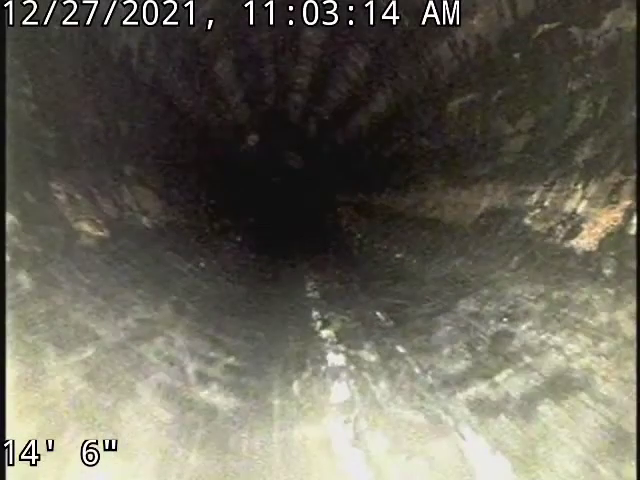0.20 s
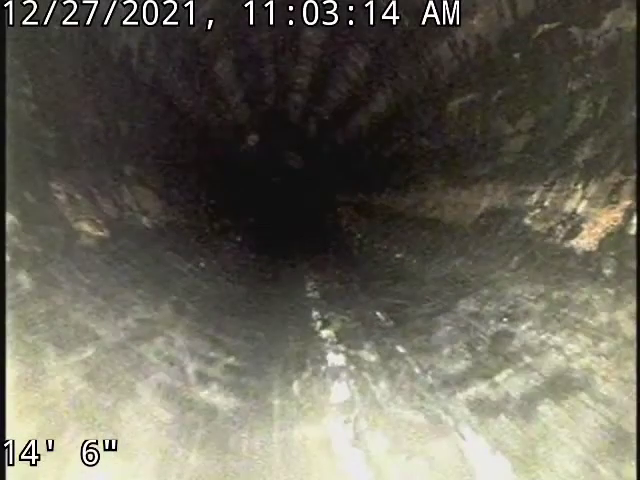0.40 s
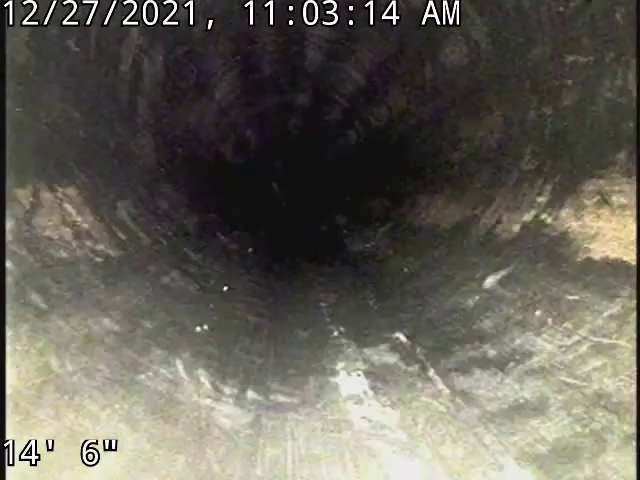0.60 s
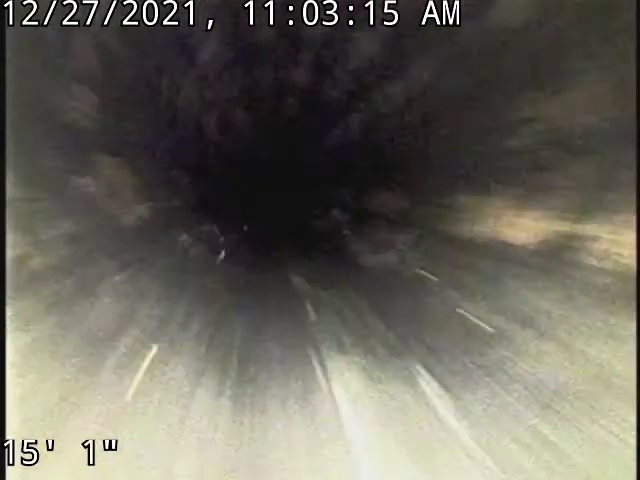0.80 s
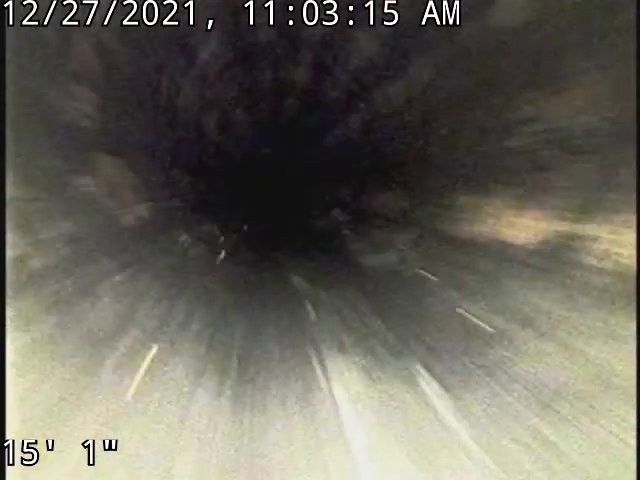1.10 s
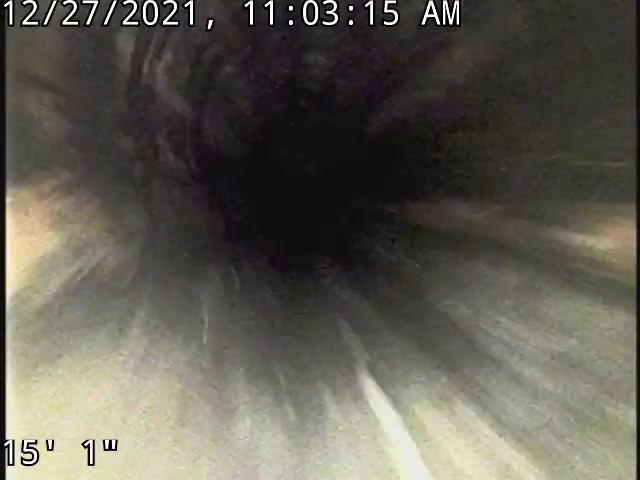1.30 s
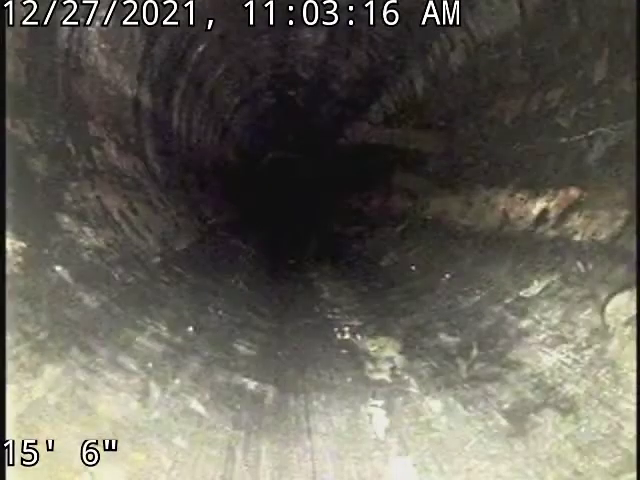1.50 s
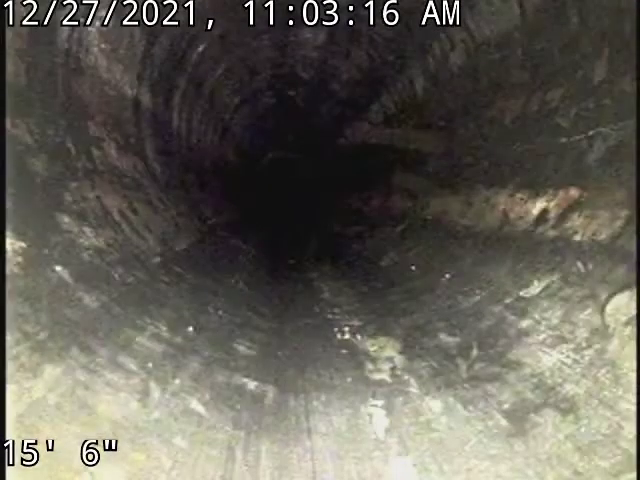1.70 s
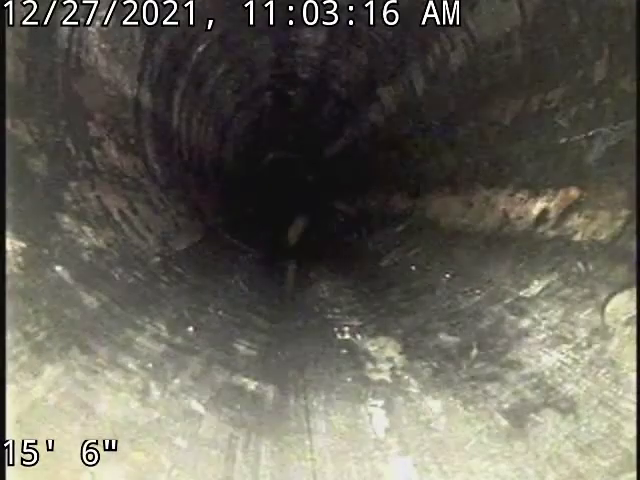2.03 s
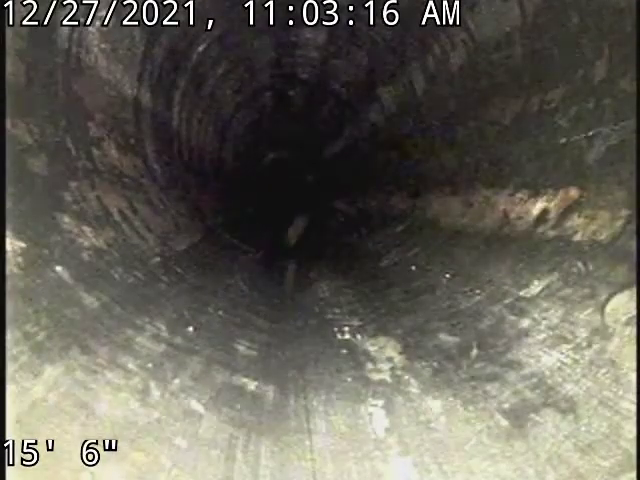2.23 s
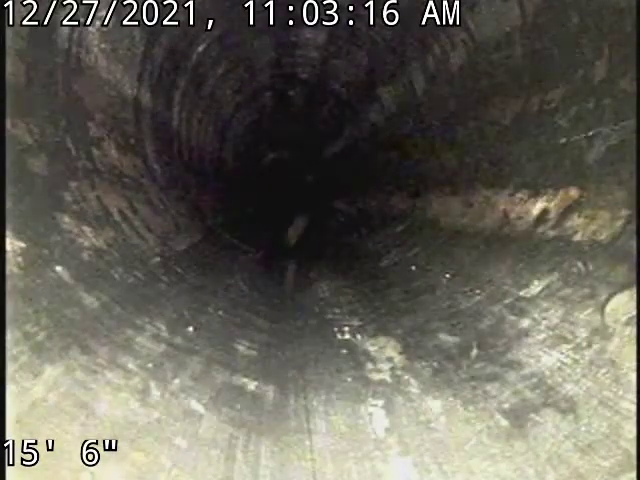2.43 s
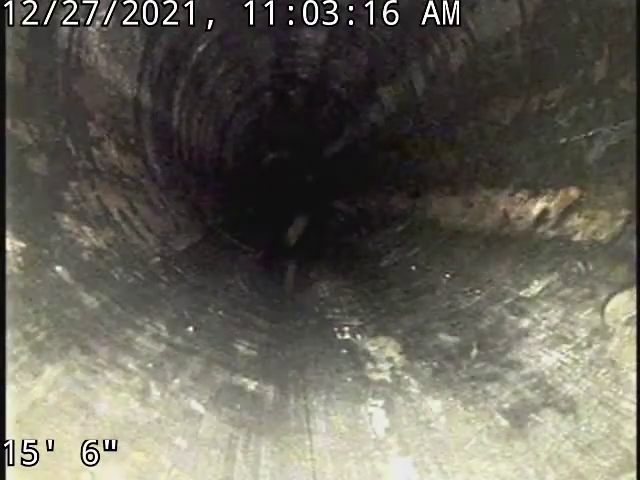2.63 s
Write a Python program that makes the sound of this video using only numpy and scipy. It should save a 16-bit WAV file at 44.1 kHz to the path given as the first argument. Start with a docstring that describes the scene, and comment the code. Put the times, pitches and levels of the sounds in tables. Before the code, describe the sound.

A stiff cable is pushed down a drain pipe, heard close in a slightly reverberant garage over faint low rumble. A light knock at the start, then gritty sliding and knocks from 0.2 s, peaking in a hard, tight clatter around 0.63 s. A stray knock at 0.9 s, then quiet with faint rustle and ticks. From 1.8 s scraping resumes, strongest near 2.2 s, with last small knocks at 2.5 s.

```python
"""A light knock on a pipe over a low rumble, then gritty sliding and a clatter of knocks: a stiff push cable
is fed by hand into a drain pipe in a garage, in two pushes with a pause between.
Friction grains (slide) and blows within short scuffs (knocks) ring the same bank of pipe modes.
Ticks and snaps are resonated noise bursts; treble hiss and rustle are shaped grains; rumble and air are
shaped noise, and a faint hum in the pause is noise through a narrow resonance."""
import sys
import numpy as np
from scipy import signal
from scipy.fft import rfft, irfft, next_fast_len
from scipy.io import wavfile

SR = 44100
rng = np.random.default_rng(int(sys.argv[2]) if len(sys.argv) > 2 else 0)


def log_audio(samples):
    """Write samples as a 16-bit WAV file to the path given in sys.argv[1]."""
    # one column per channel
    frames = np.atleast_2d(samples).T
    # limit to full scale, then quantise
    limited = np.clip(frames, -1, 1)
    pcm = np.round(limited * 32767).astype(np.int16)
    wavfile.write(sys.argv[1], SR, pcm)


N = 123480

# Spectrum of the still air: (frequency [Hz], relative density [dB])
AIR_COLOUR = [(88, -53), (150, -9.5), (320, -13.5), (394, -21), (765, -31.5), (1280, -25), (1600, -34),
              (2530, -30), (8820, -46), (13900, -21)]
# Swells of the garage's low rumble: (time [s], level [dB])
RUMBLE_LEVEL = [(0.0, -71), (0.06, -48.5), (0.12, -64), (0.2, -51), (0.55, -51), (0.6, -71), (0.65, -44),
                (0.8, -55), (1.2, -62), (1.35, -64.5), (1.68, -68), (1.86, -51.5), (2.35, -51.5),
                (2.7, -57), (2.74, -60), (2.8, -61)]
# Spectrum of the rumble: (frequency [Hz], relative density [dB])
RUMBLE_COLOUR = [(24, -35), (40, -7), (92, -1), (111, -3.5), (150, -17), (200, -42), (330, -120)]
# Faint rustle of the hands on the cable during the pause: (time [s], level [dB])
RUSTLE_LEVEL = [(0.98, -83), (1.106, -67.5), (1.15, -68), (1.258, -70.5), (1.32, -81), (1.518, -72.5),
                (1.76, -71.5)]
# Spectrum of the rustle: (frequency [Hz], relative density [dB])
RUSTLE_COLOUR = [(1060, -58), (1800, -15.5), (3400, -11), (4150, -20), (4740, -16), (8000, -20.5),
                 (10400, -44), (17600, -120)]
# Course of the treble hiss, before its flutter: (time [s], level [dB])
HISS_LEVEL = [(0.0, -64), (0.16, -67), (0.26, -51.5), (0.4, -52), (0.54, -49), (0.6, -45), (0.7, -62),
              (0.9, -69.5), (1.28, -97), (1.47, -65), (1.7, -68.5), (1.82, -60), (2.07, -52.5),
              (2.16, -47.5), (2.24, -47.5), (2.39, -54), (2.46, -71.5), (2.62, -65.5), (2.75, -51.5),
              (2.8, -49)]
# Spectrum of the treble hiss: (frequency [Hz], relative density [dB])
HISS_COLOUR = [(5000, -46.5), (8500, -6), (8900, -21.5), (9650, -5.5), (10500, -11), (13400, 0.5),
               (14000, 6.5)]
# Thin high snaps: (time [s], relative level [dB])
SNAPS = [(1.2855, -47.5), (1.33, -43), (1.7394, -41.5), (1.7511, -24), (1.7744, -60), (1.9582, -32),
         (1.997, -14), (2.0877, -36), (2.108, -35)]
# Small ticks: (time [s], relative level [dB], pitch [Hz])
TICKS = [(1.0103, -46, 4740), (1.108, -57, 3720), (1.1216, -50.5, 3400), (1.2233, -43, 3600),
         (1.2265, -52, 5360), (1.285, -58, 3200), (1.375, -61, 2480), (1.4437, -56.5, 6750),
         (1.7522, -47.5, 2790), (1.7522, -51, 5400), (1.998, -45, 6000), (2.675, -68, 1980),
         (2.7118, -54, 3730)]
# Rubbing force of the sliding cable:
# (time [s], low modes [dB], middle modes [dB], high and top modes [dB])
SLIDE = [(0.0, -60, -67, -67), (0.14, -54.5, -71, -63), (0.22, -34.5, -35.5, -49), (0.29, -39, -42, -46.5),
         (0.37, -34.5, -50, -45), (0.43, -39, -46.5, -44.5), (0.5, -39.5, -43, -44),
         (0.57, -41.5, -36.5, -40.5), (0.62, -35, -26, -33.5), (0.68, -41.5, -42, -43.5),
         (0.73, -44, -58, -52), (0.85, -57.5, -61, -63), (1.01, -63.5, -68.5, -69.5),
         (1.22, -77, -77.5, -90), (1.47, -67, -75.5, -77), (1.75, -68, -72.5, -72.5),
         (1.82, -43, -53.5, -53.5), (1.88, -49, -39, -50), (1.97, -36.5, -45.5, -47),
         (2.03, -49.5, -52, -52), (2.15, -27.5, -36.5, -41.5), (2.24, -32, -35.5, -38.5),
         (2.32, -32, -42, -41.5), (2.39, -36.5, -42, -50), (2.44, -51, -52, -60), (2.51, -65, -64, -65),
         (2.58, -63.5, -67.5, -63.5), (2.8, -56.5, -60, -63.5)]
# Knocks of the cable on the pipe, relative force on each group of modes:
# (time [s], middle modes [dB], low modes [dB], high modes [dB], top modes [dB], scuff hold [s])
KNOCKS = [(0.039, -31.5, -45, -33.5, -78, 0.017), (0.16, -49, -40.5, -62, -59, 0.0084),
          (0.199, -35.5, -42, -41, -58, 0.0058), (0.223, -29.5, -65, -32, -61, 0.012),
          (0.243, -26.5, -29.5, -34, -52, 0.013), (0.266, -38, -38, -38, -55, 0.006),
          (0.31, -24.5, -25, -39, -68, 0.0067), (0.385, -31, -27, -41, -59, 0.013),
          (0.421, -42, -35, -65, -48, 0.0055), (0.605, -28, -15, -22.5, -39, 0.002),
          (0.621, -19.5, -20, -25, -39, 0.0025), (0.6313, -13, -16, -24.5, -33.5, 0.0024),
          (0.6332, -30, -21, -19.5, -33.5, 0.003), (0.644, -35, -25, -40.5, -49, 0.0019),
          (0.66, -34, -23, -67, -39, 0.0023), (0.725, -32.5, -36, -28, -48.5, 0.019),
          (0.911, -31.5, -26.5, -36.5, -49, 0.01), (0.938, -54.5, -40.5, -60.5, -51, 0.015),
          (1.641, -61, -44, -62.5, -70.5, .005), (1.733, -45, -52.5, -55.5, -68, 0.012),
          (1.807, -55, -59, -55, -69, 0.0055), (1.859, -47, -39, -49, -57, 0.0064),
          (1.885, -29, -41, -29, -64, 0.012), (1.908, -37.5, -55, -48, -50, 0.021),
          (1.98, -48, -37.5, -63, -62, 0.026), (2.057, -50, -24, -67, -51, 0.0059),
          (2.111, -33, -23.5, -57, -55, 0.0047), (2.157, -29, -19.5, -28.5, -61, 0.0075),
          (2.168, -28, -28, -25, -53, 0.0034), (2.182, -16, -12.5, -21.5, -35, 0.0024),
          (2.199, -51, -44, -63, -51, 0.0031), (2.282, -22.5, -46, -25, -65, 0.016),
          (2.325, -35, -36, -43, -56, 0.0047), (2.364, -31, -51, -34, -65, 0.0057),
          (2.379, -41, -30.5, -46, -61, 0.023), (2.457, -45, -48.5, -48, -75, 0.01),
          (2.509, -28, -26.5, -30.5, -53, 0.0066), (2.524, -33.5, -26.5, -54, -54, 0.0024),
          (2.541, -47, -37, -38.5, -52, 0.0035)]
# How a knock reaches the low, middle, high and top modes, one row each:
# (delay of the blow [s], blow gain [dB], scuff gain [dB], scuff attack [s], shortest scuff fade [s])
CONTACT = [(0.00563, 21, -2, 0.0037, 0.009), (0.00371, 25, 2.5, 0.0069, 0.0071),
           (0.0021, 7, 0.5, 0.0045, 0.0057), (.002, 4.5, -2.5, .003, 0.0055)]
# Ringing modes of the pipe:
# (frequency [Hz], gain when knocked [dB], gain when rubbed [dB], 60 dB decay time [s])
PIPE_MODES = [(192.7, -0.5, 0, 0.096), (273.8, 2, 2, 0.065), (333.7, -0.5, -0.5, 0.057),
              (443, -3.5, -4.5, 0.052), (514, -8, -9, 0.06), (621.4, -0.5, 2.5, 0.033),
              (802, -1.5, 2.5, 0.023), (869.6, -2, 3, 0.035), (1027.6, -2.5, -2, 0.038),
              (1088, -1, -2.5, 0.025), (1234, -4, -0.5, 0.017), (1454, 0, 3, 0.016), (1915, 2.5, 2, 0.0047),
              (2483, 3, 4.5, 0.0039), (3120, 1, 4.5, 0.0044), (3754, -3, 2.5, 0.0048),
              (4340, -6, 0, 0.0025), (5300, -7.5, 1.5, 0.004), (6080, -12.5, -1.5, 0.0013),
              (7560, -13.5, -4, 0.0053), (10300, -8.5, -42.5, .001), (13200, -4.5, -20, 0.0041)]
# Borders between the low, middle, high and top modes: (frequency [Hz])
GROUP_EDGES_HZ = [575, 1380, 9000]

AIR_DB, AIR_DRIFT_DB = -73, 4.2
HUM_HZ, HUM_DB, HUM_T60_S = 370, -66.5, 0.15
HUM_START_S, HUM_TOP_S, HUM_END_S = 1.38, 1.58, 1.62
HISS_FLUTTER_DB, SLIDE_FLUTTER_DB = 1.5, 1.5
GRIT_PER_S, GRIT_SPREAD_DB = 6000, 1.11
RATTLE_PER_S, RATTLE_SPREAD_DB = 3700, 3.13
GARAGE_T60_S, GARAGE_DB, WALL_CUT_HZ, GARAGE_BASS_CUT_HZ = 0.23, -8.5, 5500, 750
SNAP_HZ, SNAP_T60_S, SNAP_ATTACK_S, SNAP_FADE_S, SNAP_GAIN_DB = 13600, 0.0024, 0.0017, 0.00088, 3
SNAP_BODY_HZ, SNAP_BODY_T60_S, SNAP_BODY_DB = 7980, 0.0005, -28
TICK_T60_S, TICK_ATTACK_S, TICK_FADE_S, TICK_GAIN_DB = 0.0013, 0.00022, 0.005, 2
KNOCK_SPREAD_DB = 1.12
FADE_PER_HOLD = 0.3  # longer scuffs die away more slowly
# Harder knocks sound brighter: dB per octave for each dB of strength in the high modes
BRIGHTER_PER_DB, EVEN_AT_DB, TILT_FROM_HZ = 0.14, -33, 3000
STOPBAND_EDGE_HZ = 14291.5


def from_db(db):
    """Amplitude factor of a level in dB."""
    return 10 ** (np.asarray(db) / 20)


def rms_one(x):
    """Signal scaled to an rms of 1."""
    return x / np.sqrt(np.mean(x ** 2) + 1e-20)


def in_time(rows):
    """Each column of a time table, drawn as straight lines at every sample."""
    s, *columns = np.transpose(rows)
    return [np.interp(np.arange(N) / SR, s, column) for column in columns]


def drift(rate_hz):
    """Slow random wandering with an rms of 1: noise through two equal low-pass poles."""
    step = 40  # samples between the drawn points
    pole = np.exp(-2 * np.pi * rate_hz * step / SR)
    noise = rng.standard_normal(N // step + 2002)
    slow = signal.lfilter([1], [1, -2 * pole, pole ** 2], noise)[2000:]  # skip the filter's start
    return np.interp(np.arange(N) / step, np.arange(len(slow)), rms_one(slow))


def coloured(x, points):
    """Noise shaped to a spectrum that drops 40 dB within an octave outside its ends; rms 1."""
    hz = np.arange(1, N // 2 + 2) * SR / N
    at, db = np.transpose(points)
    at = np.r_[at[0] / 2, at, at[-1] * 2]
    db = np.r_[db[0] - 40, db, db[-1] - 40]
    gain = from_db(np.interp(np.log(hz), np.log(at), db))
    return rms_one(irfft(rfft(x) * gain, N))


def ring(x, hz, t60):
    """A decaying two-pole resonance; unit white noise in gives rms 1 out."""
    pole = from_db(-60 / (t60 * SR))
    angle = 2 * np.pi * hz / SR
    feed = np.sqrt((1 - pole ** 2) / 2) * np.array([1, 0, -1])
    return signal.lfilter(feed, [1, -2 * pole * np.cos(angle), pole ** 2], x + 1e-18)


def grit(per_s=GRIT_PER_S, spread_db=GRIT_SPREAD_DB):
    """Friction as dense random grains of uneven size and either sign; rms 1."""
    sizes = from_db(spread_db * np.minimum(rng.exponential(1, N), 4))
    signs = rng.choice([-1, 1], N)
    return rms_one(sizes * signs * (rng.random(N) < per_s / SR))


def bursts(s, db, hold_s, attack_s, fade_s):
    """Envelope of short contacts: straight attack within the hold or fade, then exponential fade."""
    out = np.zeros(N + SR)
    t = np.arange(SR // 8) / SR
    for start, level_db, hold, fade in np.broadcast(s, db, hold_s, fade_s):
        attack = np.minimum(t / attack_s, 1)
        decay = np.exp(-np.maximum(t - hold, 0) / fade)
        i = int(start * SR)
        out[i:i + len(t)] += from_db(level_db) * attack * decay
    return out[:N]


def still_air():
    """Faint shaped noise whose level wanders slowly."""
    return from_db(AIR_DB + AIR_DRIFT_DB * drift(1.7)) * coloured(rng.standard_normal(N), AIR_COLOUR)


def low_rumble():
    """The garage's rumble: bass noise following a level curve."""
    return from_db(in_time(RUMBLE_LEVEL)[0]) * coloured(rng.standard_normal(N), RUMBLE_COLOUR)


def garage(x):
    """Reverberation of twelve feedback delays, duller on every round and thin in the bass."""
    size = next_fast_len(N + SR)
    hz = np.arange(size // 2 + 1) * SR / size
    echoes = 0
    for k, lag_s in enumerate(np.geomspace(.0043, .0237, num=12)):
        loss = from_db(-60 * lag_s / GARAGE_T60_S) / (1 + 1j * hz / WALL_CUT_HZ)
        loop = loss * np.exp(-2j * np.pi * hz * lag_s)
        echoes = echoes + (-1) ** k * loop / (1 - loop)  # all rounds of one delay
    bass_cut = (1j * hz / (GARAGE_BASS_CUT_HZ + 1j * hz)) ** 2
    return irfft(rfft(x, size) * echoes * bass_cut, size)[:N] / np.sqrt(12)


def hum():
    """A faint hum swelling in the pause: noise through a narrow resonance."""
    swell = np.interp(np.arange(N) / SR, [HUM_START_S, HUM_TOP_S, HUM_END_S], [0, 1, 0])
    return from_db(HUM_DB) * swell * ring(rng.standard_normal(N), HUM_HZ, HUM_T60_S)


def hand_rustle():
    """Hands rubbing the cable between the pushes: shaped friction grains."""
    t = np.arange(N) / SR
    during = (t > RUSTLE_LEVEL[0][0]) * (t < RUSTLE_LEVEL[-1][0])
    return from_db(in_time(RUSTLE_LEVEL)[0]) * coloured(grit(), RUSTLE_COLOUR) * during


def treble_hiss():
    """Gritty hiss: treble-shaped friction grains with a fluttering level."""
    level_db = in_time(HISS_LEVEL)[0] + HISS_FLUTTER_DB * drift(16)
    return from_db(level_db) * coloured(grit(), HISS_COLOUR)


def snaps():
    """Very short noise cracks ringing a high resonance, with a weak, duller body."""
    s, db = np.transpose(SNAPS)
    crack = rng.standard_normal(N) * bursts(s, db + SNAP_GAIN_DB, 0, SNAP_ATTACK_S, SNAP_FADE_S)
    body = ring(crack, SNAP_BODY_HZ, SNAP_BODY_T60_S)
    return ring(crack, SNAP_HZ, SNAP_T60_S) + from_db(SNAP_BODY_DB) * body


def ticks():
    """Each tick is a tiny noise crackle passed twice through a broad resonance of its own pitch."""
    out = np.zeros(N)
    for s, db, hz in TICKS:
        envelope = bursts([s], [db + TICK_GAIN_DB], [0], TICK_ATTACK_S, TICK_FADE_S)
        crackle = rng.standard_normal(N) * envelope
        out += ring(ring(crackle, hz, TICK_T60_S), hz, TICK_T60_S) / 4
    return out


def pipe():
    """Slide and knocks drive the same modes; a knock is a blow in a scuff, its strength varied per mode."""
    s, mid_db, low_db, high_db, top_db, hold = np.transpose(KNOCKS)
    hit_db = [low_db, mid_db, high_db, top_db]
    rub_low_db, rub_mid_db, rub_high_db = in_time(SLIDE)
    rub_db = [rub_low_db, rub_mid_db, rub_high_db, rub_high_db]
    flutter_db = SLIDE_FLUTTER_DB * drift(10.2)
    rubbing, scuffing = grit(), grit(RATTLE_PER_S, RATTLE_SPREAD_DB)
    groups = np.searchsorted(GROUP_EDGES_HZ, [mode[0] for mode in PIPE_MODES])
    spread_db = KNOCK_SPREAD_DB * rng.standard_normal((len(s), len(PIPE_MODES)))
    slide, knocks = np.zeros(N), np.zeros(N)
    for k, ((hz, knocked_db, rubbed_db, t60), g) in enumerate(zip(PIPE_MODES, groups)):
        share_db = -10 * np.log10(np.sum(groups == g))  # a group divides its power among its modes
        sign = (-1) ** k
        delay, blow_db, scuff_db, attack, fade = CONTACT[g]
        strength_db = hit_db[g] + spread_db[:, k]
        if g == 2:  # only the high modes tilt with strength
            strength_db += BRIGHTER_PER_DB * (high_db - EVEN_AT_DB) * np.log2(hz / TILT_FROM_HZ)
        scuff_shape = bursts(s, strength_db + scuff_db, hold, attack, fade + FADE_PER_HOLD * hold)
        force = scuffing * scuff_shape
        force[((s + delay) * SR).astype(int)] += from_db(strength_db + blow_db)
        knocks += sign * from_db(knocked_db + share_db) * ring(force, hz, t60)
        rub = rubbing * from_db(rub_db[g] + flutter_db)
        slide += sign * from_db(rubbed_db + share_db) * ring(rub, hz, t60)
    return slide, knocks


def scene():
    """All layers together; only knocks and ticks excite the garage's reverberation."""
    background = still_air() + low_rumble() + hum() + hand_rustle()
    slide, knocks = pipe()
    struck = knocks + ticks()
    reverb = from_db(GARAGE_DB) * garage(struck)
    return (background + reverb + treble_hiss() + snaps() + slide + struck)[None]


def record(dry):
    """A steep low-pass filter cuts the very top by 70 dB."""
    return signal.sosfilt(signal.cheby2(20, 70, STOPBAND_EDGE_HZ, fs=SR, output="sos"), dry)


dry = scene()
out = record(dry)
log_audio(out)
```